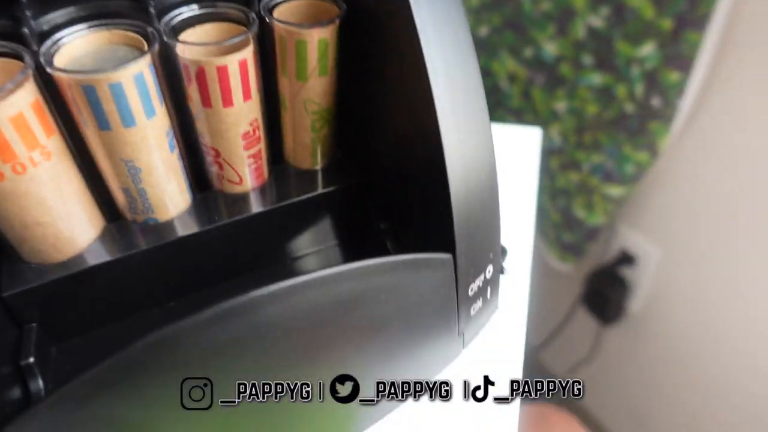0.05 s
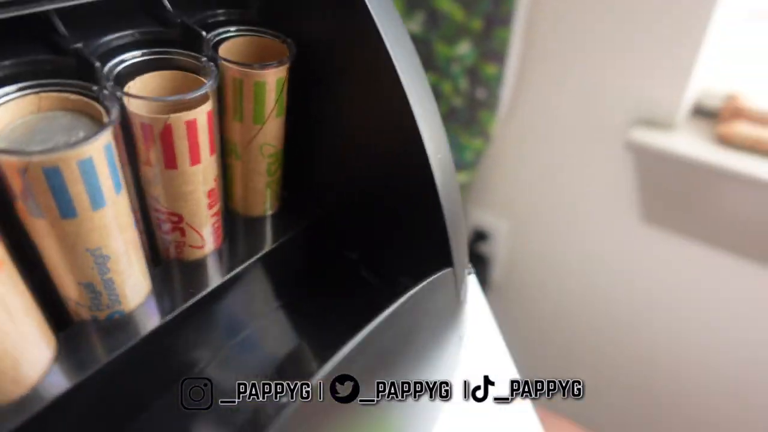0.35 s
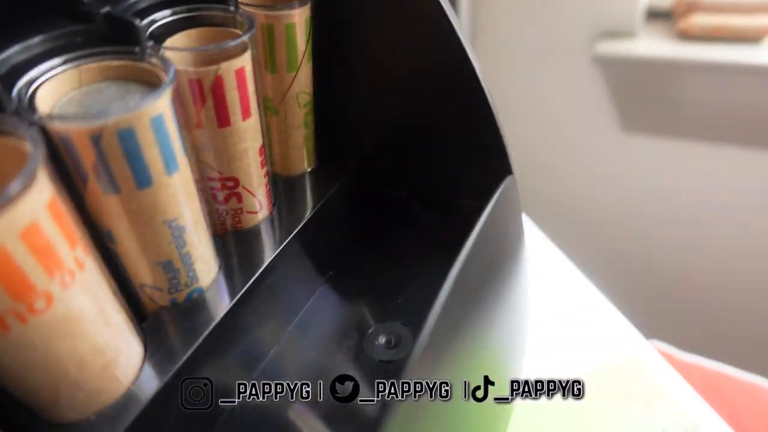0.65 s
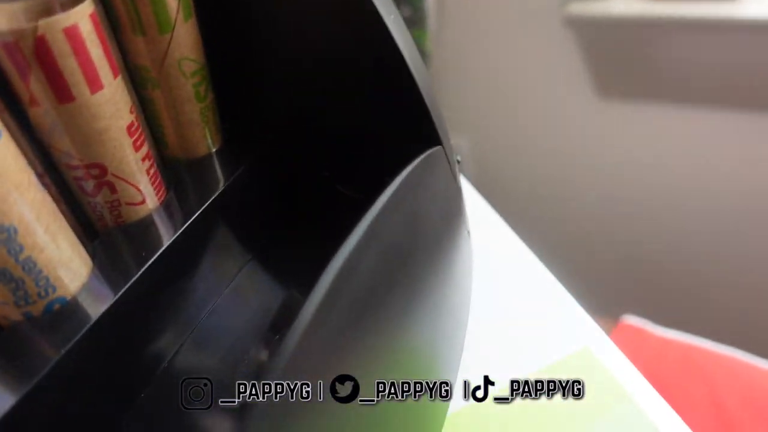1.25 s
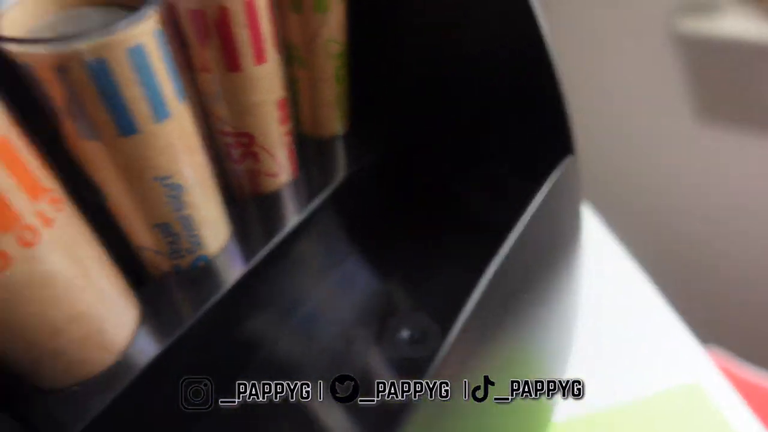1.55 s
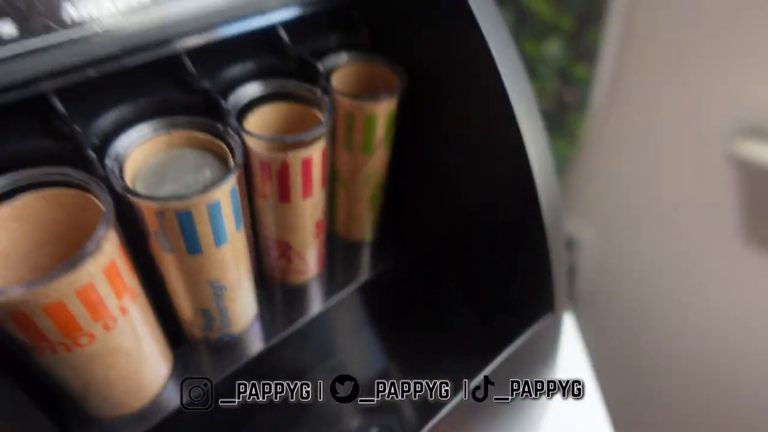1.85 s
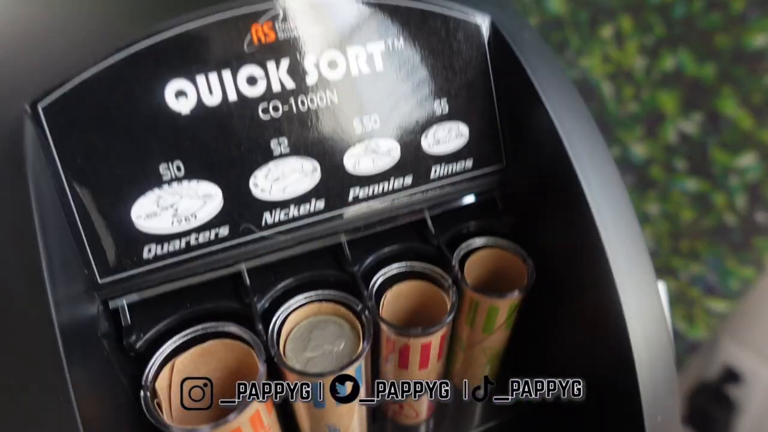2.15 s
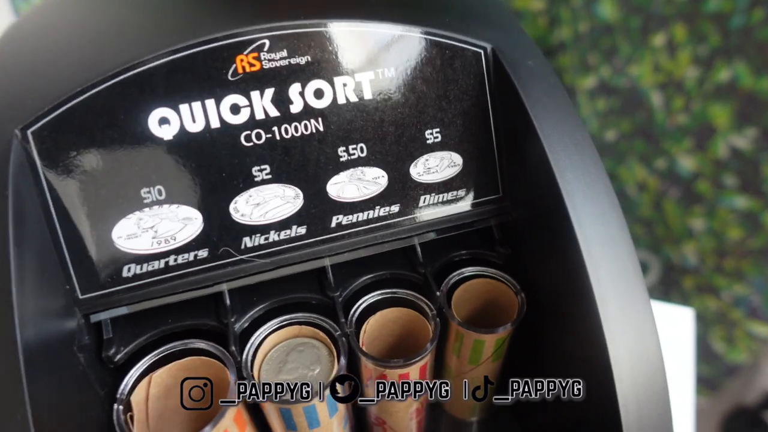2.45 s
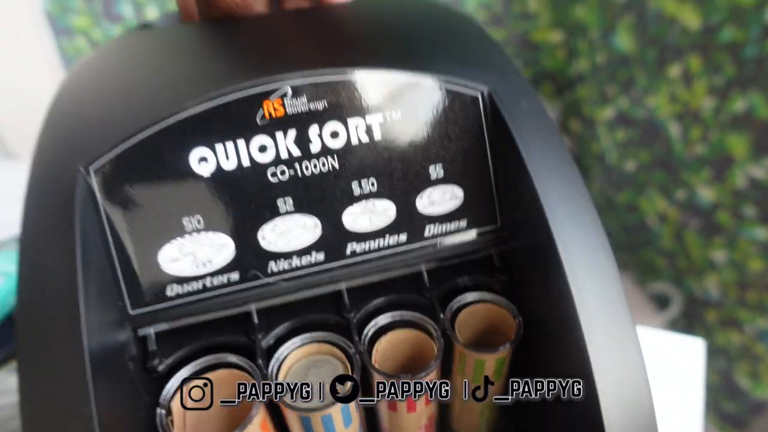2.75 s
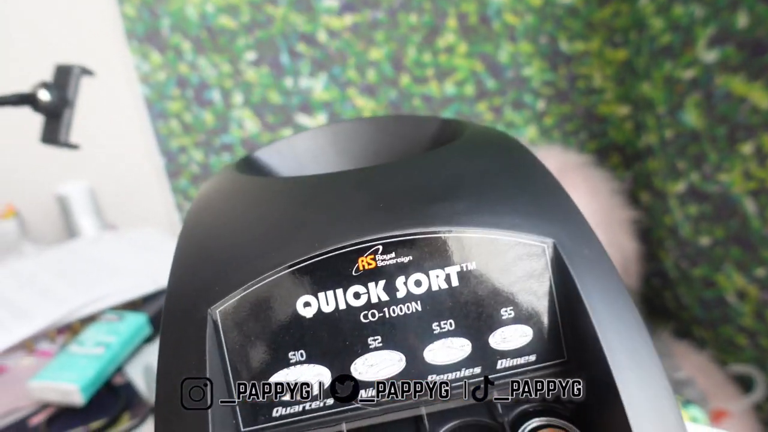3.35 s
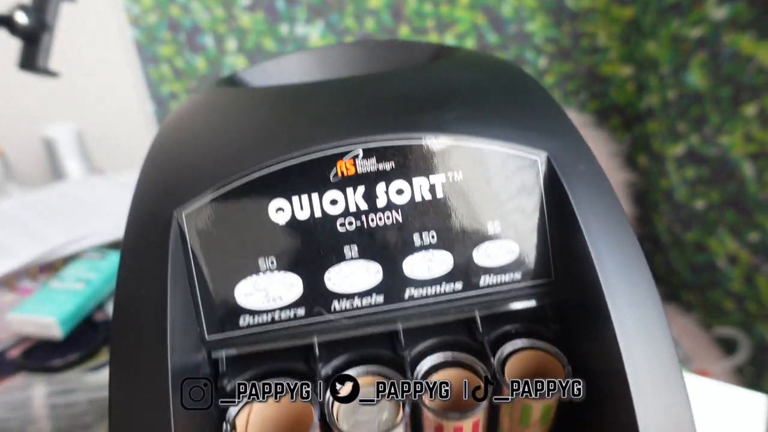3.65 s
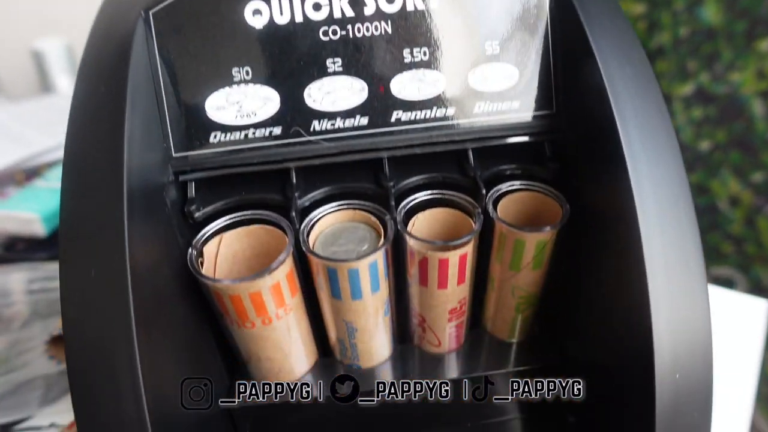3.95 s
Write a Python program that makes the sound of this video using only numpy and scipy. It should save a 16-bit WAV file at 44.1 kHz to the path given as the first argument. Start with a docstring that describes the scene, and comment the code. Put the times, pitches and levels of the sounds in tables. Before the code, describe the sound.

An electric coin sorter hums close by in a small room, snapping hollowly about every 0.4 seconds throughout, with lighter ticks between. Coins slide softly inside until about 1.8 seconds. At 2.4 seconds the plastic case is knocked. Coins are then stirred in the hopper, clattering and chinking loudly against plastic and each other from 2.6 to 3.2 seconds, and again from 3.5 to 4 seconds.

```python
"""Electric coin sorter, close, small room.

The motor hums and coins slide on the turning disc. The mechanism snaps once per step and the case
booms; light ticks fall between snaps. The plastic case is knocked, then a hand stirs the hopper twice:
coins strike plastic and each other. Contacts are clicks driving noise-band rings and single modes.
The loudest peaks are limited."""
import sys
import numpy as np
from scipy import signal
from scipy.fft import rfft, irfft
from scipy.io import wavfile
from scipy.ndimage import uniform_filter1d, minimum_filter1d

SR = 44100
rng = np.random.default_rng(int(sys.argv[2]) if len(sys.argv) > 2 else 0)


def transcribe(signal):
    """Save signal, clipped to [-1, 1], as a 16-bit WAV file at the path in sys.argv[1]."""
    frames = np.atleast_2d(signal).T
    limited = np.clip(frames, -1, 1)
    pcm = np.round(limited * 32767).astype(np.int16)
    wavfile.write(sys.argv[1], SR, pcm)


N = 176400
T = np.arange(N) / SR

# motor and mains lines: freq_hz, level_db, waver_db
HUM_LINES = [(121.4, -53, 2.5), (238.5, -43, 2), (275.3, -50.5, 2), (324.4, -56.5, 3.5), (351, -56, 3)]
# hum envelope: time_s, gain_db
HUM_ENVELOPE = [(0, -5), (.3, 3.5), (.8, 2.5), (1.1, -0.5), (1.6, 4.5), (2.0, -0.5), (2.4, -2.5),
                (3.0, -19), (3.35, 4.5), (4, -21)]
# gear noise: freq_hz, gain_db
GEAR_SPECTRUM = [(25, -52), (60, -21), (95, -4), (160, -5.5), (220, 7.5), (420, -0.5), (800, 1), (1250, 1),
                 (1600, 2.5), (2050, -3), (2400, -3), (3100, -6.5), (3800, -9), (4500, -7), (5500, -16),
                 (9000, -25.5), (16000, -66)]
GEARS_DB, MESH_HZ, MESH_DEPTH = -37, 38.34, 0.069
WHINE_HZ, WHINE_T60_S, WHINE_DB = 2357, 0.027, -47

# coins sliding on the disc: time_s, level_db
SLIDE_ENVELOPE = [(0, -7), (.48, -8), (.56, 1), (.82, 0.5), (.98, -8), (1.15, -3.5), (1.36, 1), (1.48, -3),
                  (1.55, 6), (1.72, -6.5), (1.9, -22), (2.1, -36), (2.4, -35), (4, -23)]
SLIDE_PER_S, SLIDE_DB = 2500, -35
# coin on coin, dense ring: freq_hz, level_db, t60_s
COIN_RING = [(100, -55, .02), (1500, 9, 0.029), (3930, -4, 0.059), (6500, 10.5, 0.016), (8000, 8.5, 0.025),
             (9200, 11, 0.053), (11800, 5, 0.025), (14100, 6, .02), (15500, 4, .04)]
# coin rim shimmer: freq_hz, level_db, t60_s
COIN_RIM_MODES = [(4400, -33.5, 0.034), (6400, -45, .04), (9620, -37, 0.042), (9400, -31.5, .07),
                  (14600, -36, .05), (15600, -32, .06)]
RIM_SWELL_DB, COIN_HIGHPASS_HZ = 6.5, 178

# mechanism ticks: start_s, level_db
TICK_EVENTS = [(.0268, 0), (0.4057, 2.5), (.775, -3), (1.158, -3.5), (1.543, 0.5), (1.916, -11),
               (2.3077, -0.5), (3.437, -7)]
# tick, dense ring: freq_hz, level_db, t60_s
LIGHT_TICK_RING = [(60, -40, .1), (300, -7, 0.084), (1500, -1.5, 0.16), (2400, 6, 0.079),
                   (3480, -13.5, .08), (4500, -1.5, 0.066), (5300, -8.5, 0.097), (8800, -12.5, 0.023),
                   (16000, -43, .04)]
TICK_DB = 8

# mechanism snaps: start_s, level_db, rebound_lag_s, rebound_db, treble_db
SNAP_EVENTS = [(.2772, -2, .0085, -29, 5.5), (0.6554, 0.5, .009, -14, 2.5), (1.0350, 1.5, .0087, -17, 2.5),
               (1.4146, -1.5, .006, -14, 3), (1.7951, -2.5, .008, -5.5, 4),
               (2.1765, 1.5, .013, -11.5, -1.5), (2.557, 1, .008, -8.5, 0), (2.935, -6.5, .009, -10, 3),
               (3.3158, 2.5, .012, -10, -6.5), (3.696, -7.5, .009, -7, 3)]
# mechanism, dense ring: freq_hz, level_db, t60_s
MECHANISM_RING = [(50, -53, .1), (151, -35, .1), (486, -5.5, 0.3), (700, -1.5, 0.17), (886, 0, 0.033),
                  (1050, 6, 0.11), (1980, 3, 0.17), (3400, 1, 0.088), (4330, -1, 0.1), (5200, -5.5, 0.15),
                  (6300, 4.5, 0.052), (10800, -0.5, 0.047), (13500, -16, 0.029), (16200, -20, .035)]
# mechanism, strongest modes: freq_hz, level_db, t60_s
MECHANISM_MODES = [(650, -30, 0.17), (1022, -22.5, 0.033), (1654, -30, 0.13), (2400, -23.5, 0.05),
                   (4480, -17.5, 0.027), (7040, -22.5, 0.063)]
SNAP_DB, CRACK_DB, CRACK_T60_S, TREBLE_HZ = 13, -3, 0.004, 3630
# case boom: freq_hz, level_db, t60_s
CASE_BOOM_MODES = [(220, -36, 0.21), (278.7, -28, 0.26), (325, -38, 0.11), (358, -34.5, 0.11),
                   (477, -27, 0.056)]
# hollow knock in the boom: freq_hz, level_db, t60_s
CASE_HOLLOW_RING = [(60, -40, .1), (200, -13, .12), (400, -9, 0.17), (620, 4, 0.078), (820, -19, .05),
                    (1100, -17, .05), (3000, -32, .04), (16000, -60, .03)]
BOOM_LAG_S, HOLLOW_DB = .017, 6.5

# knocks on the case: start_s, thud_db, edge_db
KNOCK_EVENTS = [(0.4737, -6.5, -26), (2.433, 4.5, -8), (2.4532, 6, 12.5), (2.472, -5, -7)]
# knocked case, dense ring: freq_hz, level_db, t60_s
THUD_RING = [(40, -14, .2), (80, 5, 0.24), (252, 15, 0.18), (423, 1.5, 0.15), (900, 11, 0.17),
             (1600, 6.5, .1), (3200, 8.5, 0.049), (6000, -8, 0.1), (16000, -28, .03)]
# knocked case, modes: freq_hz, level_db, t60_s
THUD_MODES = [(605, -33, 0.18), (902, -21, 0.11), (990, -50, .06), (1530, -32, .1)]
# sharp edge of a knock or coin strike: freq_hz, level_db, t60_s
SHARP_EDGE_RING = [(80, -55, .03), (500, -20, .03), (3000, -29, 0.02), (6000, 2, 0.024), (9700, 2.5, 0.025),
                   (11900, -17, 0.024), (16000, -12, .02)]

# single coins ringing out: start_s, pitch_hz, level_db, t60_s
PING_EVENTS = [(.80, 15600, -35, .3), (0.844, 9400, -38, 0.31), (1.29, 15450, -42, .3),
               (1.312, 6400, -33, .03), (2.6222, 3400, -7, 0.054), (2.6215, 1570, -8.5, .12),
               (2.794, 5200, -9, 0.048), (2.798, 4010, -10, 0.066), (2.821, 7800, -16, 0.029),
               (2.875, 6500, -13, 0.024), (2.934, 8550, -16, 0.041), (2.99, 4400, -8, 0.11),
               (3.675, 7860, -13, 0.041), (3.771, 4416, -4, 0.026), (3.826, 7000, -15, .06),
               (3.835, 14950, -28, 0.13), (3.846, 12560, -25, 0.22)]
PING_TOUCH_S, PING_LOSS_DB, PING_SPREAD = .004, 2, 0.0237

# stirring: time_s, coin_on_plastic_db, coin_on_coin_db
STIR_ENVELOPE = [(2.50, -57, -26), (2.59, -46, -2.5), (2.619, -30, 4), (2.634, -13, -17), (2.648, -5, 5.5),
                 (2.67, 1.5, -1.5), (2.78, 4.5, 2), (2.93, -0.5, 0.5), (3.06, -1.5, -0.5),
                 (3.115, -13.5, -21), (3.155, -6.5, -10.5), (3.19, -44, -43), (3.25, -48, -60),
                 (3.42, -24, -47), (3.445, -14.5, -12), (3.488, -24, -47), (3.51, -4, -4.5),
                 (3.562, -23, -7.5), (3.575, 1, -20), (3.605, -4, -40), (3.675, 2, -8.5), (3.86, 6.5, -1.5),
                 (3.893, 1.5, -16), (3.915, 3, -3), (3.955, -0.5, -11), (3.98, 6.5, -6), (4.0, 11, 12)]
HITS_PER_S, HITS_DB, HITS_SPREAD_DB, SURGE_DB = 340, -5, 2, 2
CHINKS_PER_S, CHINKS_DB, CHINKS_SPREAD_DB = 600, -14, 5.5
# single loud coin strikes: start_s, plastic_db, edge_db
CLACK_EVENTS = [(2.596, -29, 8), (2.6205, 12, 14), (2.691, 10, 15), (2.794, -5, -1), (2.814, -2.5, -8),
                (2.854, -14, 5), (2.964, -7.5, -15), (2.983, 7.5, -14), (3.034, -5, 2), (3.059, 7, 11),
                (3.137, -5.5, 2), (3.5065, 4, -5), (3.518, 3, -14), (3.537, 9.5, 1), (3.567, 8.5, 0),
                (3.573, 6.5, -2), (3.633, 5, 5), (3.638, 16, -3), (3.659, -1, 5), (3.743, -4, 3),
                (3.771, 1, 11), (3.86, 10, 16), (3.908, -2, 9.5), (3.938, 3.5, 8), (3.976, 3, 5)]
CLACK_DB, HOPPER_DB = 2.5, 13
# hopper, dense ring: freq_hz, level_db, t60_s
HOPPER_WALL_RING = [(50.4, -49, 0.11), (141, -50, 0.061), (236, -10.5, 0.26), (420, -24, 0.029),
                    (506, -2, 0.085), (730, -4.5, 0.079), (980, 4.5, 0.04), (1400, 1.5, 0.1),
                    (2090, -2.5, 0.012), (2540, 3.5, 0.036), (3550, -5, 0.034), (4400, -1.5, 0.015),
                    (5200, -11, 0.022), (9100, -19.5, 0.017), (16000, -54, .02)]
# hopper, modes: freq_hz, level_db, t60_s
HOPPER_WALL_MODES = [(1267, -30, 0.056), (1316, -24, 0.028), (1384, -27, .05), (1446, -26, 0.062),
                     (1520, -31, .05), (1723, -29, 0.046), (4270, -30, 0.038), (4345, -32, 0.024)]
# drive to the hopper modes: time_s, gain_db
HOPPER_DRIVE = [(2.6, -5), (2.72, -0.5), (2.9, 4.5), (3.0, 7.5), (3.15, 0), (3.5, 8), (3.72, -0.5),
                (3.82, -1), (4, -12)]
# case drone under the coins: freq_hz, level_db, t60_s
CASE_DRONE_MODES = [(275.5, -33.5, 0.17), (523, -37, 0.11), (664, -32, 0.12), (717.5, -31, 0.14),
                    (1032, -27.5, 0.075), (1906, -24.5, 0.065), (3110, -27, 0.06)]
# drive to the drone: time_s, gain_db
DRONE_DRIVE = [(2.6, -11), (3.1, -15.5), (3.5, -6), (3.6, -3), (3.8, -6), (3.95, -3)]

# room tail: freq_hz, level_db, t60_s
ROOM_TAIL = [(80, -69, 0.4), (294, -13, 0.13), (676, -11, 0.22), (2000, -11.5, 0.43), (7000, -11.5, 0.32),
             (10800, -10, 0.29), (16100, -20, 0.27)]
# stereo width: freq_hz, gain_db
SIDE_SPECTRUM = [(25, -16), (60, -20), (300, -18), (700, -22), (1300, -26), (5000, -22), (16000, -24)]
# rightward lean of the lows: freq_hz, gain_db
LEAN_SPECTRUM = [(60, -21), (300, -27), (700, -30), (1400, -42), (3000, -55)]
# diffuse room noise: freq_hz, gain_db
AIR, AIR_DB = [(25, 2), (120, 6), (300, 19), (1000, 23), (4000, -45), (16000, -52)], -59.5
RING_RISE_S = .0003
LIMIT, RELEASE_DB_PER_S, CUTOFF_HZ = 0.71, 902, 15900


def from_db(db):
    """Decibels to gain."""
    return 10 ** (np.asarray(db) / 20)


def unit_rms(x):
    """Scale to rms 1."""
    return x / np.sqrt(np.mean(x ** 2) + 1e-20)


def in_time(rows, column=1):
    """Table column at every sample."""
    rows = np.array(rows)
    return np.interp(T, rows[:, 0], rows[:, column])


def at_hz(rows, hz, column=1):
    """Table column over log frequency."""
    rows = np.array(rows)
    return np.interp(np.log(hz + 1e-9), np.log(rows[:, 0]), rows[:, column])


def coloured(x, spectrum):
    """Filter by a spectrum table."""
    return irfft(rfft(x) * from_db(at_hz(spectrum, np.fft.rfftfreq(N, 1 / SR))), N)


def highpass(x, hz):
    """Fourth-order high-pass."""
    return signal.sosfilt(signal.butter(4, hz, "high", fs=SR, output="sos"), x)


def drift(rate_hz):
    """Slow random curve, rms 1."""
    rolloff = 1 + (np.fft.rfftfreq(N, 1 / SR) / rate_hz) ** 2
    return unit_rms(irfft(rfft(rng.standard_normal(N)) / rolloff, N))


def clicks(start_s, db):
    """One impulse per event."""
    out = np.zeros(N)
    np.add.at(out, np.clip((np.asarray(start_s) * SR).astype(int), 0, N - 1), from_db(db))
    return out


def shower(per_s, spread_db):
    """Random contacts of uneven strength and sign."""
    sizes = from_db(spread_db * np.clip(rng.standard_normal(N), -2, 2)) * rng.choice([-1, 1], N)
    return sizes * (rng.random(N) < per_s / SR)


def dense_ring(table):
    """Impulse response: sixth-octave noise bands, each with its own level and decay."""
    size = 16384
    edges_hz = 30 * 2 ** (np.arange(56) / 6)
    t, bins_hz = T[:size], np.fft.rfftfreq(size, 1 / SR)
    white, out = rfft(rng.standard_normal(size)), 0
    for low, high in zip(edges_hz, edges_hz[1:]):
        hz = np.sqrt(low * high)
        decay = np.exp(-np.log(1000) * t / at_hz(table, hz, column=2))
        band = irfft(white * ((bins_hz >= low) & (bins_hz < high))) * decay
        out += unit_rms(band) * from_db(at_hz(table, hz)) * np.sqrt(2 * (high - low) / SR / size)
    return out * (1 - np.exp(-t / RING_RISE_S))


def strike(force, table, spots=1):
    """Contacts land on random spots of a body, each with its own dense ring."""
    spot = rng.integers(0, spots, N)
    return sum(signal.fftconvolve(force * (spot == k), dense_ring(table))[:N] for k in range(spots))


def resonate(force, modes, vary_db):
    """Two-pole modes; drive varies per contact and mode."""
    out = 0
    for hz, db, t60_s in modes:
        radius, angle = np.exp(-np.log(1000) / (t60_s * SR)), 2 * np.pi * hz / SR
        drive = force * from_db(db + vary_db * np.clip(rng.standard_normal(N), -2, 2))
        out += signal.lfilter([.5, 0, -.5], [1, -2 * radius * np.cos(angle), radius ** 2], drive + 1e-18)
    return out


def motor():
    """Wavering hum lines, gear noise pulsing at the mesh rate, a narrow whine."""
    hum = 0
    for hz, db, waver_db in HUM_LINES:
        amplitude = np.sqrt(2) * from_db(db + waver_db * drift(4.7))
        hum += amplitude * np.sin(2 * np.pi * hz * T + 0.65 * drift(1.3))
    mesh = 1 + MESH_DEPTH * np.sin(2 * np.pi * MESH_HZ * T + drift(2))
    grit = rng.standard_normal(N) + 0.92 * unit_rms(shower(per_s=900, spread_db=3.5))
    teeth = mesh * grit * from_db(drift(3.4))
    gears = from_db(GEARS_DB) * unit_rms(coloured(teeth, GEAR_SPECTRUM))
    whine = unit_rms(resonate(teeth, [(WHINE_HZ, 0, WHINE_T60_S)], vary_db=0))
    whine *= from_db(WHINE_DB + 2.5 * drift(3))
    return hum * from_db(in_time(HUM_ENVELOPE)) + gears + whine


def slide_contacts():
    """Force of coins sliding on the disc: dense, faint contacts."""
    return shower(SLIDE_PER_S, spread_db=1.5) * from_db(SLIDE_DB + in_time(SLIDE_ENVELOPE))


def coin_metal(force):
    """Rubbed and struck coins ring; their rim modes swell at random."""
    body = strike(force, COIN_RING, spots=6)
    swell = from_db(RIM_SWELL_DB * np.clip(drift(6), -2, 1.5))
    return body + resonate(force * swell, COIN_RIM_MODES, vary_db=4.5)


def ticks():
    """Light contacts in the mechanism between snaps."""
    return from_db(TICK_DB) * strike(clicks(*np.transpose(TICK_EVENTS)), LIGHT_TICK_RING, spots=2)


def snaps():
    """Each step of the mechanism: a crack, a ringing snap, a rebound."""
    start_s, db, lag_s, rebound_db, _ = np.transpose(SNAP_EVENTS)
    impact = clicks(start_s, db)
    force = impact + clicks(start_s + lag_s, db + rebound_db)
    crack_ring = [(hz, level_db, CRACK_T60_S) for hz, level_db, _ in MECHANISM_RING]
    crack = from_db(CRACK_DB) * highpass(strike(impact, crack_ring, spots=3), hz=2580)
    snap = crack + from_db(SNAP_DB) * strike(force, MECHANISM_RING, spots=4)
    snap += resonate(force, MECHANISM_MODES, vary_db=7.5)
    dull = signal.sosfilt(signal.butter(1, TREBLE_HZ, fs=SR, output="sos"), snap)
    treble = (snap - dull) * from_db(in_time(SNAP_EVENTS, column=4))
    return highpass(dull + treble, hz=463)


def case_booms():
    """The hollow case rings just after each snap."""
    start_s, db = np.transpose(SNAP_EVENTS)[:2]
    force = clicks(start_s + BOOM_LAG_S, db)
    boom = resonate(force, CASE_BOOM_MODES, vary_db=2)
    return boom + from_db(HOLLOW_DB) * strike(force, CASE_HOLLOW_RING, spots=3)


def knocks():
    """Dull thuds on the case with a sharp edge."""
    start_s, thud_db, edge_db = np.transpose(KNOCK_EVENTS)
    force = clicks(start_s, thud_db)
    thud = resonate(force, THUD_MODES, vary_db=0) + strike(force, THUD_RING)
    return thud + strike(clicks(start_s, edge_db), SHARP_EDGE_RING)


def pings():
    """A coin touches three times and rings: short as a pitch cluster, long as one pitch."""
    out, t = np.zeros(N + SR), T[:SR // 3]
    for start_s, hz, db, t60_s in PING_EVENTS:
        spread = PING_SPREAD if t60_s < .1 else 0
        decay = np.exp(-np.log(1000) * t / t60_s)
        for touch in range(3):
            start = int((start_s + touch * PING_TOUCH_S * rng.uniform(.7, 1.3)) * SR)
            pitches_hz = hz * (1 + spread * rng.standard_normal((5, 1)))
            tone = np.sin(2 * np.pi * pitches_hz * t).mean(axis=0)
            out[start:start + len(t)] += from_db(db - touch * PING_LOSS_DB) * tone * decay
    return out[:N]


def stir_contacts():
    """Forces of stirred coins, surging together: hits on plastic, chinks on each other."""
    surge_db = SURGE_DB * drift(31)
    hits = shower(HITS_PER_S, HITS_SPREAD_DB) * from_db(HITS_DB + in_time(STIR_ENVELOPE) + surge_db)
    chink_db = CHINKS_DB + in_time(STIR_ENVELOPE, column=2) + surge_db
    return hits, shower(CHINKS_PER_S, CHINKS_SPREAD_DB) * from_db(chink_db)


def hopper(hits):
    """Coin hits ring the plastic hopper; the case drones below."""
    wall = from_db(HOPPER_DB) * strike(hits, HOPPER_WALL_RING, spots=5)
    wall += resonate(hits * from_db(in_time(HOPPER_DRIVE)), HOPPER_WALL_MODES, vary_db=6)
    return wall + resonate(hits * from_db(in_time(DRONE_DRIVE)), CASE_DRONE_MODES, vary_db=1.5)


def coins():
    """Sliding, stirring and single hard strikes drive plastic and metal."""
    clack_s, clack_db, edge_db = np.transpose(CLACK_EVENTS)
    hits, chinks = stir_contacts()
    sliding = slide_contacts()
    plastic = hopper(hits + clicks(clack_s, clack_db + CLACK_DB))
    metal = coin_metal(chinks + sliding) + pings()
    edges = strike(clicks(clack_s, edge_db), SHARP_EDGE_RING, spots=4)
    return highpass(plastic + metal + edges, COIN_HIGHPASS_HZ)


def scene():
    """Machine and room, nearly mono, with slight diffuse width."""
    direct = snaps() + case_booms() + ticks() + knocks() + coins()
    mid = direct + strike(direct, ROOM_TAIL) + motor()
    scattered = strike(mid, [(100, 0, .15), (2000, 0, .04), (10000, 0, .02)])  # freq_hz, level_db, t60_s
    air = from_db(AIR_DB) * unit_rms(coloured(rng.standard_normal(N), AIR))
    side = coloured(scattered, SIDE_SPECTRUM) - coloured(mid, LEAN_SPECTRUM) + air
    return np.array([mid + side, mid - side])


def record(dry):
    """Fast peak limiter, then a steep low-pass."""
    over_db = np.maximum(20 * np.log10(np.abs(dry).max(axis=0) / LIMIT + 1e-9), 0)
    held_db = np.maximum.accumulate(over_db + RELEASE_DB_PER_S * T) - RELEASE_DB_PER_S * T
    gain_db = uniform_filter1d(minimum_filter1d(-held_db, size=31), size=31)
    lowpass = signal.ellip(12, .1, 80, CUTOFF_HZ, fs=SR, output="sos")
    return signal.sosfilt(lowpass, dry * from_db(gain_db))


dry = scene()
out = record(dry)
transcribe(out)
```